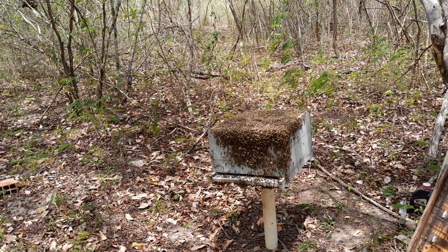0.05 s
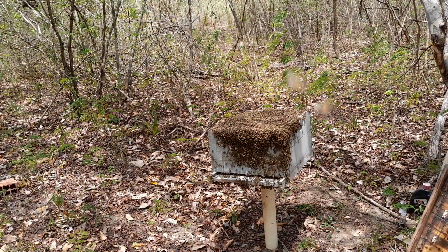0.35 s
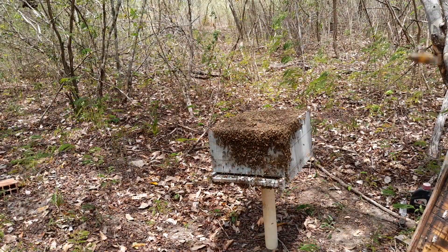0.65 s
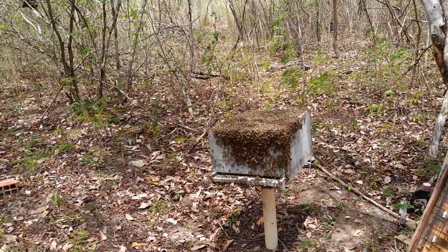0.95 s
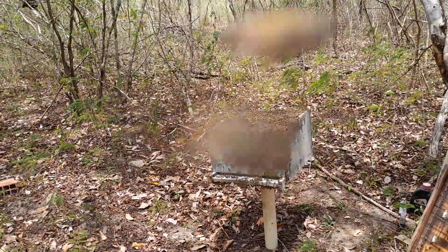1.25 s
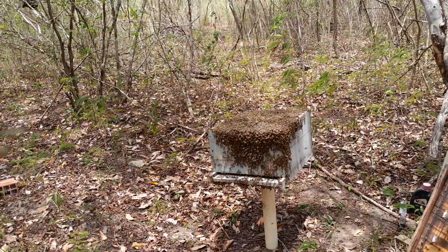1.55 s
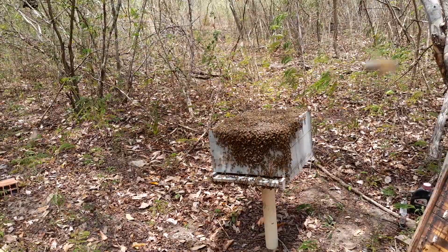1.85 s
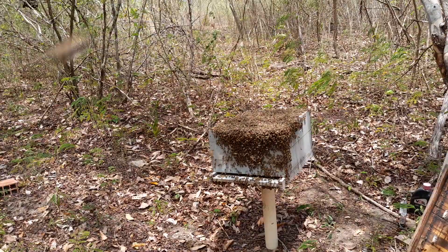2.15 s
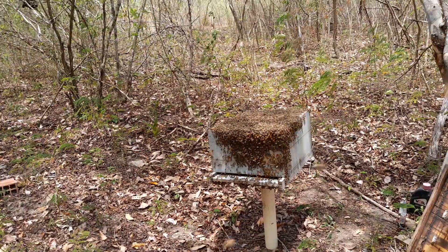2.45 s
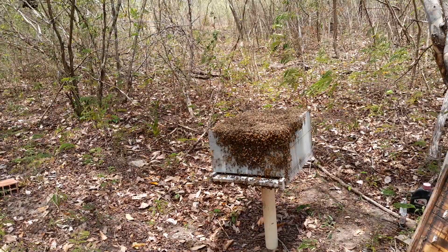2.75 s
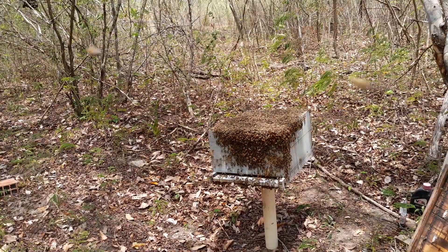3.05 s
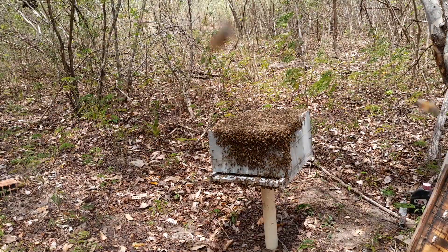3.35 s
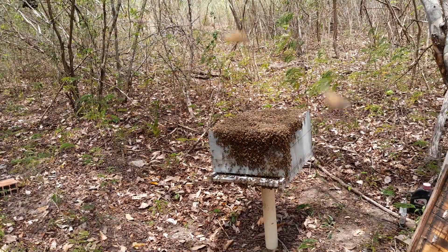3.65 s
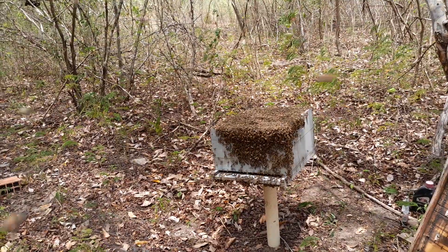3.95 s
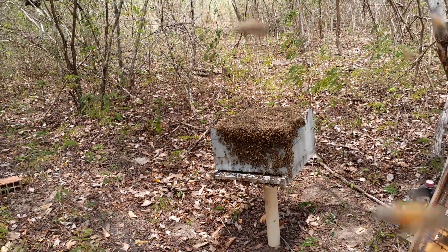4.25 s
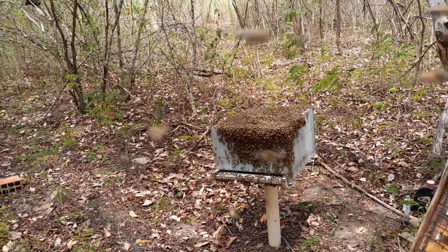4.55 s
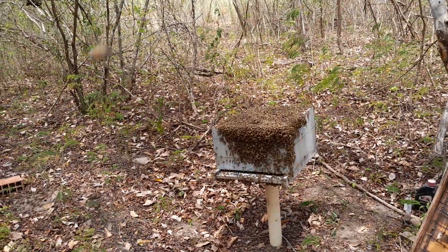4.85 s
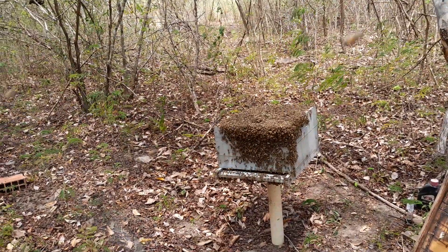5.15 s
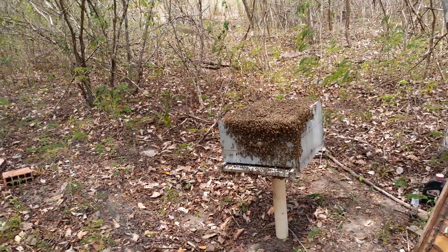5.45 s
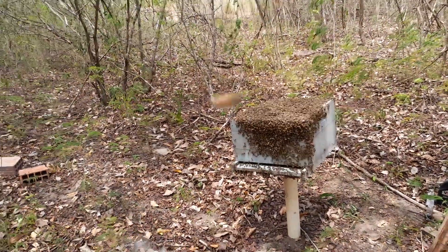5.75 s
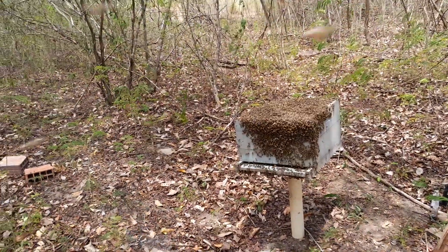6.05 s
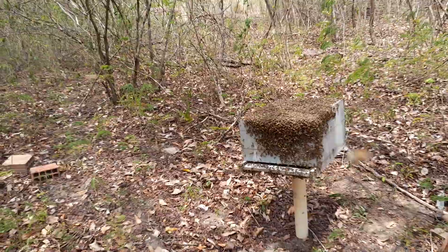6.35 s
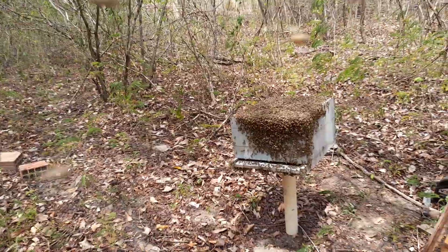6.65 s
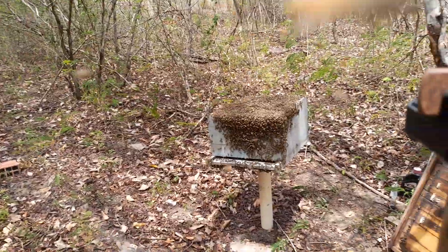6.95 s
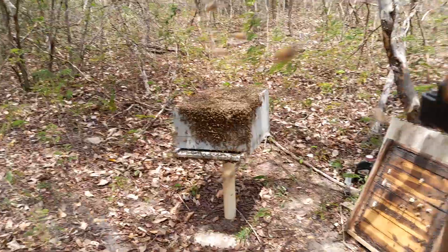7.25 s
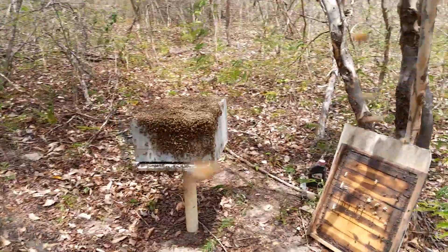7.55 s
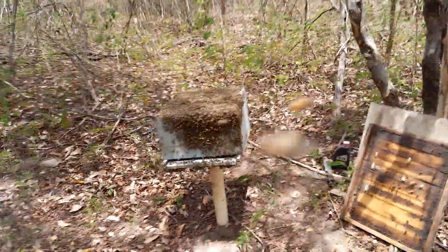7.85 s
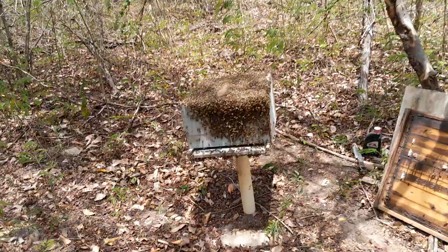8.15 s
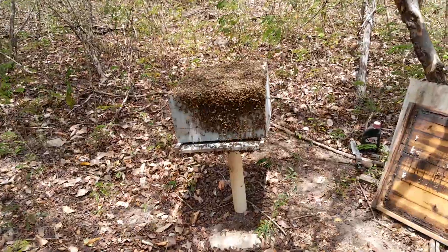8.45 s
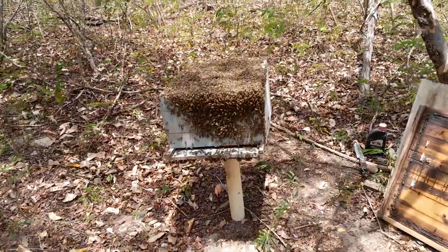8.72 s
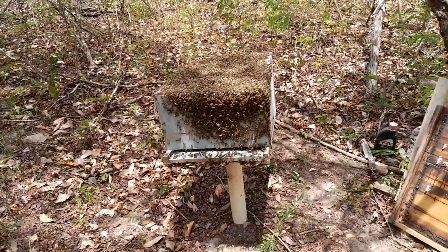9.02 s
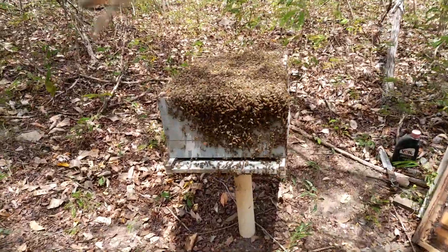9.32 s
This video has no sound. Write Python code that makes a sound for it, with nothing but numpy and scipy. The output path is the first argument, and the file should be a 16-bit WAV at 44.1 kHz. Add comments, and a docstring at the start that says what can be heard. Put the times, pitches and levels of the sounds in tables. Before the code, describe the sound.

Outdoors among trees, a soft hiss and low puffs of wind on the microphone give way to the thick, wavering buzz of a honeybee colony. Dozens of bees circle in stereo, some darting very close. Faint leaf crackles and dry clicks dot the hum. A little after halfway comes a loud metal snap, then a smaller one with clinks and a scrape, while the bees keep droning to the end.

```python
"""The hum of honeybees swells out of a soft hiss: a colony swarming over an open hive box in dry woodland.
Dozens of bees, each a train of wingbeat pulses, wander in pitch and distance around a stereo microphone;
some swerve close by or zip right past its ports, where a light breeze rumbles.
Dry leaves rustle, gear scrapes and ticks, and one sharp metallic snap makes the gain control duck."""
import sys
import numpy as np
from scipy import signal
from scipy.fft import rfft, irfft, next_fast_len
from scipy.io import wavfile
from scipy.ndimage import uniform_filter1d, minimum_filter1d

SR = 44100
rng = np.random.default_rng(int(sys.argv[2]) if len(sys.argv) > 2 else 0)


def generate_wav(signal):
    """Clip the signal to [-1, 1] and save it as 16-bit WAV at the path in sys.argv[1]."""
    frames = np.transpose(np.atleast_2d(signal))
    scaled = np.clip(frames, -1, 1) * 32767
    pcm = np.round(scaled).astype(np.int16)
    wavfile.write(sys.argv[1], SR, pcm)


N = 418068
CONTROL_HZ = 500  # update rate of slow motion
PORT_LAG_S = 0.00055  # travel time from one microphone port to the other


def from_db(db):
    """Decibels to gain."""
    return 10 ** (np.asarray(db) / 20)


def rms_one(x):
    """Scales a sound to rms 1."""
    return x / np.sqrt(np.mean(x ** 2) + 1e-20)


def clock():
    """The time of every sample."""
    return np.arange(N) / SR


def in_time(rows):
    """The columns of a curve, sample by sample."""
    s, *columns = np.transpose(rows)
    return [np.interp(clock(), s, c) for c in columns]


def panned(db):
    """Left and right gains of mean power 1; a positive pan is to the left."""
    gains = from_db(np.array([[.5], [-.5]]) * db)
    return gains / np.sqrt(np.mean(gains ** 2, axis=0))


def butter(x, hz, kind):
    """A gentle causal filter."""
    return signal.sosfilt(signal.butter(2, hz, kind, fs=SR, output="sos"), x)


def below(x, hz):
    """The part of a sound below hz, with no phase shift."""
    return signal.sosfiltfilt(signal.butter(4, hz, fs=SR, output="sos"), x)


def coloured(x, spectrum):
    """Gives a sound a smooth spectral shape."""
    size = next_fast_len(x.shape[-1])
    hz, db = np.transpose(spectrum)
    bin_hz = np.arange(size // 2 + 1) * SR / size
    shape_db = np.interp(np.log(bin_hz + 1), np.log(hz), db)
    return irfft(rfft(x, size) * from_db(shape_db), size)[..., :x.shape[-1]]


def drift(rate_hz, t):
    """A smooth random wander of rms about 1, read at times t."""
    r = np.exp(-2 * np.pi * rate_hz / CONTROL_HZ)
    slow = signal.lfilter([1], [1, -2 * r, r * r], rng.standard_normal(7000))[1500:]
    return np.interp(t * CONTROL_HZ, np.arange(len(slow)), rms_one(slow))


def stereo_noise(alike):
    """White noise, partly shared by the two channels."""
    return np.sqrt(alike) * rng.standard_normal(N) + np.sqrt(1 - alike) * rng.standard_normal((2, N))


def swell(t, s, half_s):
    """The power of a sound that rises and falls around time s."""
    return np.exp(-np.minimum(((t - s) / half_s) ** 2, 50))


def add(track, s, sound):
    """Mixes a short sound in at time s."""
    start = max(round(s * SR), 0)
    track[..., start:start + sound.shape[-1]] += sound[..., :N - start]


def pulses(times, sizes):
    """Impulses placed between samples."""
    inside = (times > 0) & (times * SR < N - 1)
    whole, part = np.divmod(times[inside] * SR, 1)
    out = np.zeros(N)
    out[whole.astype(int)] = sizes[inside] * (1 - part)
    out[whole.astype(int) + 1] += sizes[inside] * part
    return out


def among_trees(x, scatter_db, decay_s):
    """Direct sound reaches the microphone with short scatter from ground, box and trunks."""
    t = np.arange(SR // 10) / SR
    echoes = rng.standard_normal((2, len(t))) * np.exp(-t / decay_s)
    echoes *= from_db(scatter_db) / np.sqrt(np.sum(echoes ** 2, axis=1, keepdims=True))
    return x + signal.oaconvolve(x, echoes, axes=1)[:, :N]


# colour of the hiss all round the microphone: f/Hz, gain/dB
HISS_SPECTRUM = [(30, -12), (150, 10), (400, 15.5), (1200, 9.5), (3000, -2), (6000, 0), (8000, 0),
                 (9300, -2.5), (13000, 0), (16000, -1)]
# its treble above 8 kHz: t/s, level/dB
HISS_TREBLE = [(0, -53.5), (3.9, -54), (4.75, -56.5), (5.1, -55), (6.8, -56.5), (8.1, -52), (8.4, -55.5),
               (8.52, -52), (9.48, -54.5)]
def airy_hiss(waver_db=1.0):
    """A wide, soft, wavering hiss lies behind everything."""
    level_db, = in_time(HISS_TREBLE)
    noise = coloured(stereo_noise(alike=0.009), HISS_SPECTRUM)
    treble_rms = np.std(butter(noise, 8000, "high"))
    return from_db(level_db + waver_db * drift(6, clock())) * noise / treble_rms


# steady breeze on the microphone: t/s, level/dB, pan/dB
STEADY_BREEZE = [(0, -49, -53), (1.6, -38, -9), (2.8, -45.5, -28), (3.45, -61, -23), (5.1, -61.5, -10),
                 (6.5, -54, -4), (7.6, -59.5, -1), (9.48, -59, -26)]
# gusts at the ports, plus the low thumps of a knock (5.364 s) and the metal snap (5.76 s):
# t/s, level/dB, half-length/s, pan/dB, pressure swing f/Hz
GUSTS_AND_THUMPS = [(0.347, -39, 0.031, -5, 69), (0.627, -30, 0.012, -4, 88), (0.732, -30, 0.054, -20, 112),
                    (0.916, -35, 0.031, 17, 70), (1.148, -22.5, 0.036, -8, 113),
                    (1.473, -36, 0.046, 17, 90), (1.631, -26.5, 0.065, 1.5, 90),
                    (1.808, -36, 0.021, 1, 78.5), (2.111, -30, 0.043, 0.5, 102),
                    (2.244, -37, 0.042, 17, 80), (2.397, -32, 0.053, 24, 148), (2.602, -37, 0.063, -1, 90),
                    (3.191, -45.5, 0.1, -23, 55), (3.845, -49.5, 0.15, -7, 70),
                    (5.364, -36.5, 0.0044, -6, 330), (5.76, -42.5, 0.037, 29, 89),
                    (6.155, -44, 0.065, 0, 89.5), (7.028, -47, 0.055, 3, 101), (8.6, -38.5, 0.051, 8, 91),
                    (9.04, -44.5, 0.042, -34, 88.5)]
# colour of the rumble: f/Hz, gain/dB
RUMBLE_SPECTRUM = [(20, -34), (45, 0.5), (75, 5.5), (130, -2.5), (220, -9.5), (400, -18.5), (900, -35.5),
                   (2000, -83)]
def breeze_and_thumps(lumpy_db=5, swing_db=6):
    """Lumpy rumble swells at the ports with each gust or thump, whose pressure pushes and then pulls."""
    level_db, side_db = in_time(STEADY_BREEZE)
    power = (from_db(level_db) * panned(side_db)) ** 2
    swings, t = np.zeros((2, N)), np.arange(-SR // 4, SR // 4) / SR
    for s, peak_db, half_s, pan_db, hz in GUSTS_AND_THUMPS:
        swing = -from_db(swing_db) * np.sin(2 * np.pi * hz * t) * np.exp(-(1.47 * hz * t) ** 2)
        strength = from_db(peak_db) * panned(pan_db)
        add(power, s + t[0], strength ** 2 * swell(t, 0, half_s))
        add(swings, s + t[0], strength * swing)
    lumps = from_db(lumpy_db * np.array([drift(43.5, clock()) for ear in range(2)]))
    rumble = rms_one(coloured(stereo_noise(alike=0.074), RUMBLE_SPECTRUM) * lumps)
    return butter(np.sqrt(power) * rumble + swings, 21, "high")


# dry leaves and scraping gear (6.1-6.3 s) around the hive: t/s, level/dB, half-length/s
LEAF_AND_GEAR_RUSTLES = [(0.201, -49.5, 0.04), (0.41, -46, 0.038), (0.548, -46, 0.058),
                         (0.682, -42.5, 0.045), (1.072, -38, 0.01), (5.355, -46, 0.022),
                         (5.61, -45.5, 0.052), (6.123, -41, 0.03), (6.262, -38, 0.0051), (7.398, -51, 0.04),
                         (7.698, -48.5, 0.025), (8.019, -46, 0.022), (9.236, -44.5, 0.021)]
# their colour: f/Hz, gain/dB
RUSTLE_SPECTRUM = [(500, 23), (2000, 14.5), (4000, 14), (6000, 10.5), (9000, 9), (13000, 10.5), (16000, 0)]
def rustles(grain_db=3.5):
    """Dry leaves and scraping gear swish in swells of fine crackle."""
    t = clock()
    power = sum(from_db(db) ** 2 * swell(t, s, half_s) for s, db, half_s in LEAF_AND_GEAR_RUSTLES)
    grains = stereo_noise(alike=0.12) * from_db(grain_db * drift(140, t))
    return np.sqrt(power) * rms_one(coloured(grains, RUSTLE_SPECTRUM))


# gritty leaves and scraping gear (near 6.13 s) close by: t/s, level/dB, half-length/s, resonance f/Hz
LEAF_AND_GEAR_CRUNCHES = [(0.54, -47.5, 0.09, 5400), (5.603, -48.5, 0.014, 4750),
                          (5.706, -42.5, 0.0043, 4700), (6.137, -39.5, 0.01, 3800),
                          (6.13, -38.5, 0.0097, 2340), (7.137, -52.5, 0.033, 8050),
                          (9.238, -45, 0.024, 4300), (9.328, -48, 0.0068, 5000)]
def crunches(grains_per_s=1800, q=4.0):
    """A quick run of tiny cracks rings in a stiff leaf or in scraped metal."""
    out, t = np.zeros((2, N)), np.arange(-SR // 4, SR // 4) / SR
    for s, level_db, half_s, hz in LEAF_AND_GEAR_CRUNCHES:
        cracks = (rng.random(len(t)) < grains_per_s / SR) * rng.standard_normal((2, len(t)))
        ringing = rms_one(signal.lfilter(*signal.iirpeak(hz, q, fs=SR), cracks + 1e-18))
        add(out, s + t[0], from_db(level_db) * ringing * np.sqrt(swell(t, 0, half_s)))
    return out


def bee_bumps(per_s=16, tap_db=-47, spread_db=2.4):
    """Bees bump into dry leaves and wood at random; the microphone gets mostly scatter."""
    when, size = rng.random((int(per_s * N / SR), 2)).T
    taps = pulses(when * N / SR, from_db(tap_db - spread_db * np.log(size + 0.015)))
    ticks = butter(taps * panned(2 * drift(8, clock())), 2100, "high")
    return among_trees(ticks, scatter_db=14, decay_s=0.002)


# near the microphone, sharp dry ticks (the first a close bee's wingbeat), dull knocks and metallic snaps:
# t/s, level/dB, pan/dB
DRY_TICKS = [(0.4205, -34.5, 16), (0.668, -31, 5), (1.533, -36.5, 7), (4.2165, -39, 3),
             (5.3615, -37.5, -10), (5.423, -41, 2), (5.546, -40.5, -10), (5.5985, -35, -20),
             (6.554, -39, -6), (8.19, -42, 0), (8.566, -41.5, -2), (8.958, -40, 10)]
DULL_KNOCKS = [(0.6845, -39, 27), (5.362, -35, -8), (5.5695, -37, -20), (7.674, -35, 2)]
METAL_SNAPS = [(5.7475, -12.5, -3.5), (6.267, -27.5, -8)]
# metal gear clinks and scrapes: t/s, level/dB, pan/dB, decay/s
GEAR_CLINKS = [(5.391, -31.5, -6, 0.002), (5.759, -31, -12, 0.0072), (6.07, -34.5, -4, 0.0047),
               (6.128, -39, -8, 0.015), (7.715, -40.5, 2, 0.014)]
# metal left ringing by a knock: t/s, f/Hz, level/dB, t60/s
METAL_RINGS = [(5.748, 2000, -16, 0.014), (5.748, 2350, -17.5, 0.022), (5.748, 3750, -20, 0.01),
               (5.747, 6030, -12, 0.0058), (5.747, 2870, -49, 0.31), (5.748, 3300, -49, 0.52),
               (6.128, 2340, -31, 0.079), (6.135, 6950, -33, 0.045), (6.267, 2055, -38, 0.094),
               (6.268, 5740, -37, 0.083)]
def ticks_and_knocks(q=4.6, rise_share=0.4, low_cut_share=0.13, top_hz=14500):
    """Each click is a dying crack that excites one broad resonance; metal rings on."""
    out, t = np.zeros((2, N)), np.arange(SR // 4) / SR
    # each click gains its body: resonance f/Hz, resonance over the crack/dB, decay/s
    clicks = [(*row, 5900, -15, .0018) for row in DRY_TICKS]
    clicks += [(*row, 1460, 33, .0032) for row in DULL_KNOCKS]
    clicks += [(*row, 11700, -2, .0017) for row in METAL_SNAPS]
    clicks += [(*row, 1950, 20, decay_s) for *row, decay_s in GEAR_CLINKS]
    for s, level_db, pan_db, hz, body_db, decay_s in clicks:
        noise = rng.standard_normal((2, len(t))) + 0.33 * rng.standard_normal(len(t))
        crack = butter(noise, [low_cut_share * min(hz, 3000), top_hz], "band")
        body = signal.lfilter(*signal.iirpeak(hz, q, fs=SR), crack)
        burst = rms_one(rms_one(crack) + from_db(body_db) * rms_one(body))
        rise_s = rise_share * decay_s  # longer scrapes swell more slowly
        envelope = np.exp(-t / decay_s) * (1 - np.exp(-t / rise_s))
        add(out, s - rise_s / 2, from_db(level_db) * panned(pan_db) * burst * envelope / envelope.max())
    for s, hz, level_db, t60 in METAL_RINGS:
        phase = 2 * np.pi * hz * t + rng.uniform(0, np.pi, (2, 1))
        add(out, s, from_db(level_db - 60 * t / t60) * np.sin(phase))
    return among_trees(out, scatter_db=-6.5, decay_s=0.0068)


# pairs of bees swerving near the microphone: t/s, level/dB, wingbeat f/Hz, half-length/s
BEE_SWERVES = [(0.24, -50.5, 266.2, 0.053), (0.839, -52, 262, 0.071), (1.5, -47.5, 273.5, 0.064),
               (2.539, -44, 265, 0.024), (2.661, -44, 260, .028), (2.779, -45.5, 274.7, 0.017),
               (3.022, -45.5, 270, 0.019), (3.229, -51, 253.7, 0.097), (3.51, -48, 272, .025),
               (5.059, -50, 255.4, .035), (6.658, -49.5, 261, 0.049), (6.78, -48, 258, 0.023),
               (7.11, -44.5, 270, 0.029), (8.039, -47.5, 238, 0.072), (8.68, -50.5, 264.7, 0.13),
               (9.02, -46.5, 250.8, 0.048), (9.22, -47.5, 232, .04)]
# colour of their wing pulses: f/Hz, gain/dB
SWERVE_SPECTRUM = [(240, 5), (500, 9.5), (800, 0.5), (1400, 3), (2200, -8), (3200, -16), (9000, -22)]
def swerving_bees(companion_db=-6, flutter=.019, glide_per_s=.7, upstroke=0.22,
                  sway_db=3.5, veer_db=5, lean_db=2):
    """Two bees rasp against each other, two pulses a wingbeat; pitch bends as they swing by."""
    def voice(x):
        return butter(coloured(x, SWERVE_SPECTRUM), 155, "high")

    out, t = np.zeros((2, N)), np.arange(-125, 125) / CONTROL_HZ
    for s, level_db, wing_hz, half_s in BEE_SWERVES:
        for bee_db in (0, companion_db):
            hz = wing_hz * np.exp(flutter * drift(20, t + 1) + glide_per_s * rng.standard_normal() * t)
            turns = np.cumsum(hz) / CONTROL_HZ + rng.random()
            down = np.interp(np.arange(2, turns[-1] - 1), turns, s + t)  # downstroke times
            up = down + np.gradient(down) * (0.407 + 0.058 * drift(6.6, down))
            size = from_db(level_db + bee_db + sway_db * drift(19, down))
            size *= np.sqrt(swell(down, s, half_s))
            side_db = lean_db + veer_db * drift(2.02, down)
            lag = PORT_LAG_S / 2 * np.tanh(side_db / 6)
            for ear, heard in enumerate(size * panned(side_db)):
                late = lag if ear else -lag
                out[ear] += pulses(np.r_[down + late, up + late], np.r_[heard, -upstroke * heard])
    steady = np.arange(0, N / SR, 1 / 232)  # a steady 232 Hz wingbeat stands for 0 dB
    steady_rms = np.std(voice(pulses(steady, np.ones(len(steady)))))
    return voice(among_trees(out, scatter_db=-5.0, decay_s=0.0074)) / steady_rms


# single bees right at the microphone:
# t/s, level/dB, wingbeat f/Hz, half-length/s, pan/dB, lift of the fundamental/dB
BEE_PASSES = [(0.419, -30, 269.2, 0.0013, 32, -14), (0.686, -23.5, 244, 0.0013, 30, -2),
              (0.770, -33.5, 260.6, 0.0039, 30, 2), (1.072, -30, 266.8, 0.0049, 24, -5),
              (1.149, -36, 247, .03, 24, 0), (1.864, -27.5, 242, 0.0021, 23, 2),
              (2.38, -48.5, 275.5, 0.03, 7, 19.5), (2.817, -34.5, 280.6, 0.0028, 36, 3),
              (3.83, -41, 280.3, 0.048, -1.5, 2), (3.98, -44, 298, 0.036, 5, 2),
              (5.235, -43, 253.7, 0.015, 1.5, 3), (7.995, -27.5, 239.4, 0.0025, 26, -6),
              (8.152, -41, 212, 0.0039, 3.5, 22.5), (8.209, -46, 221, 0.0036, 5, 21),
              (8.465, -38, 238, 0.005, -2.5, 7), (8.546, -40, 269.3, 0.026, -7, 14),
              (8.961, -38, 243.4, 0.0054, 15, -1), (9.4, -35.5, 228, 0.0043, 26, -4)]
# colour of wing pulses at that range: f/Hz, gain/dB
PASS_SPECTRUM = [(80, -24), (250, 2), (520, 13.5), (800, 2.5), (1300, -17), (2200, -17), (4000, -20.5),
                 (16000, -25)]
def passing_bees(doppler=.02, waver=0.023, upstroke=0.13, reach_s=0.26,
                 wake_db=-2, wake_band_hz=(280, 1200), skim_s=0.027, trail=4.9):
    """Loudness goes as one over distance and pitch sags; a bee skimming a port fans it with gusts."""
    out, t = np.zeros((2, N)), np.arange(-SR // 2, SR // 2) / SR
    for s, level_db, wing_hz, half_s, pan_db, lift_db in BEE_PASSES:
        distance = np.hypot(1, t / half_s)  # in units of the closest approach
        receding = t / half_s / distance
        hz = wing_hz * (1 - doppler * receding + waver * drift(4, t + 1))
        turns = np.cumsum(hz) / SR
        down = np.diff(np.floor(turns), prepend=0)
        up = np.diff(np.floor(turns + 0.273), prepend=0)
        tone = rms_one(coloured(butter(down - upstroke * up, 280, "high"), PASS_SPECTRUM))
        tone = coloured(tone, [(320, lift_db), (420, 0)])
        # the nearer port hears the bee first
        lag = PORT_LAG_S * np.tanh(pan_db / 6 + rng.choice([-1, 1]) * receding)
        tone = np.array([tone, np.interp(t - lag, t, tone)])
        puffs = rng.standard_normal((2, len(t))) * np.cos(np.pi * turns) ** 2
        gusts = rms_one(butter(puffs, wake_band_hz, "band"))
        # the shorter the pass, the closer the bee; its wake trails behind and dies off steeply
        behind = np.hypot(1, t / half_s / np.where(t > 0, trail, 1))
        wake = from_db(wake_db) * gusts / (1 + (half_s / skim_s) ** 2) / behind ** 3
        bee = (tone / distance + wake) * np.exp(-(t / reach_s) ** 2)
        before_start = max(round((0.5 - s) * SR), 0)
        add(out, s - 0.5, from_db(level_db) * panned(pan_db) * bee[:, before_start:])
    return out


def throb(depth_db=4.2, rate_hz=15):
    """A gain that surges and sinks as knots of bees come and go."""
    return rms_one(from_db(2 * depth_db * np.tanh(drift(rate_hz, clock()) / 2)))


def evened(x, span_s=0.87):
    """Holds a sound near rms 1 over spans longer than one bee's visit."""
    power = uniform_filter1d(np.mean(x ** 2, axis=0), size=int(span_s * SR))
    return x / np.sqrt(np.abs(power) + 1e-20)


# mean wingbeat of the colony over the hive box: t/s, f/Hz
COLONY_WINGBEAT = [(0, 265.3), (2.3, 260.1), (3.0, 269.5), (3.9, 274.6), (4.6, 264.8), (6.0, 266.9),
                   (7.2, 270.8), (8.3, 261.7), (9.48, 266.7)]
# the swarm at the microphone, thickening and thinning: t/s, hum level/dB, buzz level/dB
SWARM_DENSITY = [(0, -58.5, -71), (0.8, -46.5, -55.5), (1.9, -46.5, -59.5), (2.7, -47, -55),
                 (3.55, -48, -53), (3.9, -41, -48.5), (4.25, -46, -55), (4.8, -48, -53),
                 (6.9, -45.5, -52.5), (7.9, -45, -52), (8.3, -45.5, -57.5), (8.55, -42.5, -52.5),
                 (9.48, -50.5, -54)]
# colour of the swarm's wing pulses: f/Hz, gain/dB
SWARM_SPECTRUM = [(100, 23), (270, -4.5), (380, -3), (540, 1), (760, -4.5), (1100, 0.5), (1400, 1.5),
                  (1950, -3.5), (2800, -11.5), (4500, -15.5), (9000, -45), (16000, -57)]
def swarm(count, spread, flutter, cloud_m, wander_hz, hum_trim_db=0, buzz_trim_db=0,
          wander=.04, closest_m=0.21, darting_hz=1.0):
    """Bees dart round the microphone, two pressure pulses a wingbeat, fainter and later with distance."""
    out, t = np.zeros((2, N)), np.arange(0, N / SR, 1 / CONTROL_HZ)
    wing_hz = np.interp(t, *np.transpose(COLONY_WINGBEAT))
    for own in np.linspace(-1, 1, count):
        hz = wing_hz * np.exp(spread * own + wander * drift(wander_hz, t) + flutter * drift(14, t))
        turns = np.cumsum(hz) / CONTROL_HZ + rng.random()
        down = np.interp(np.arange(1, turns[-1] - 1), turns, t)  # downstroke times
        up = down + np.gradient(down) * (0.406 + 0.078 * drift(0.43, down))
        across, ahead = cloud_m * drift(darting_hz, down), cloud_m * drift(darting_hz, down)
        distance = np.sqrt(across ** 2 + ahead ** 2 + closest_m ** 2)
        travel_s = distance / 343
        # the upstroke's strength depends on which way the bee faces
        facing = 0.39 * np.sin(drift(0.61, down))
        for ear, side in enumerate((across / distance, -across / distance)):
            lag = travel_s + side * PORT_LAG_S / 2
            heard = from_db(-5.5 * side) / distance
            out[ear] += pulses(np.r_[down + lag, up + lag], np.r_[heard, heard * facing])
    scattered = among_trees(out, scatter_db=-7, decay_s=0.018)
    wings = butter(coloured(scattered, SWARM_SPECTRUM), 143, "high")
    hum = below(wings, hz=700)
    buzz = evened(wings - hum) * throb(depth_db=1.9)
    # the two lowest partials beat and swell each on its own
    fundamental = below(hum, hz=380)
    hum = fundamental * throb() + (hum - fundamental) * throb()
    hum = evened(np.array([rms_one(ear) for ear in hum])) * panned(1)
    hum_db, buzz_db = in_time(SWARM_DENSITY)
    return from_db(hum_db + hum_trim_db) * hum + from_db(buzz_db + buzz_trim_db) * buzz


def scene():
    """Beside the hive: swarm and hiss all round, a few bees nearer in, and the close sounds on top."""
    crowd = swarm(count=26, spread=.1, flutter=.024, cloud_m=0.8635, wander_hz=1.1)
    near = swarm(count=3, spread=.04, flutter=.015, cloud_m=0.626, wander_hz=3.0,
                 hum_trim_db=-7, buzz_trim_db=-0.5)
    bees = crowd + near + swerving_bees() + passing_bees()
    surroundings = airy_hiss() + breeze_and_thumps() + rustles() + crunches()
    return bees + surroundings + bee_bumps() + ticks_and_knocks()


def gain_control(x, threshold_db=-26, depth_db=8.0, hold_s=0.15, release_db_per_s=19, attack_s=0.095):
    """A sharp treble peak turns the gain down; it is held, then creeps back."""
    power = uniform_filter1d(np.mean(butter(x, 1500, "high") ** 2, axis=0), size=128)
    over_db = np.clip(10 * np.log10(np.abs(power) + 1e-12) - threshold_db, 0, depth_db)
    span = int(hold_s * SR) // 2
    held_db = -minimum_filter1d(-over_db, 2 * span + 1, origin=span)
    ramp_db = release_db_per_s * clock()
    duck_db = np.maximum.accumulate(held_db + ramp_db) - ramp_db
    r = np.exp(-1 / (attack_s * SR))
    return x * from_db(-signal.lfilter([1 - r], [1, -r], duck_db))


def record(dry):
    """Behind the microphone: gain control, then a steep top cut. Before the cut, the tallest peak is softly
    rounded so it stays below full scale."""
    ceiling, cutoff_hz = .8, 15900
    x = gain_control(dry)
    rounded = x / (1 + (x / ceiling) ** 6) ** (1 / 6)
    return signal.sosfilt(signal.ellip(12, .1, 80, cutoff_hz, fs=SR, output="sos"), rounded)


dry = scene()
out = record(dry)
generate_wav(out)
```